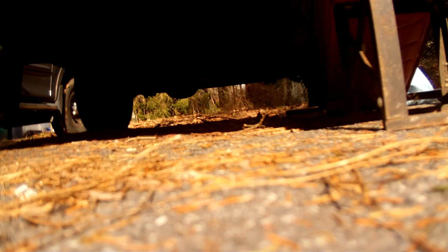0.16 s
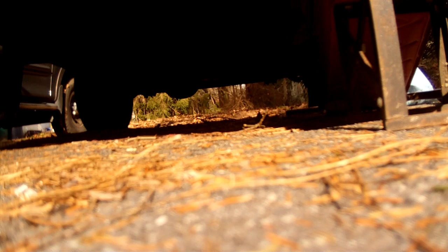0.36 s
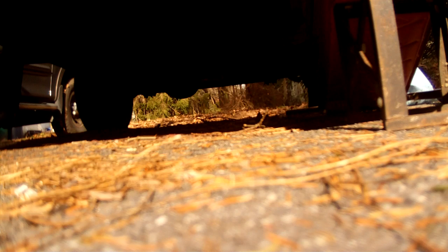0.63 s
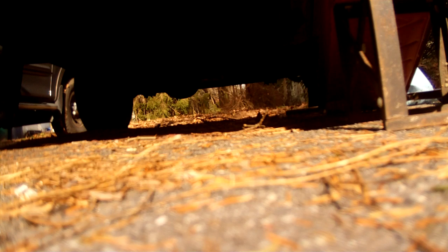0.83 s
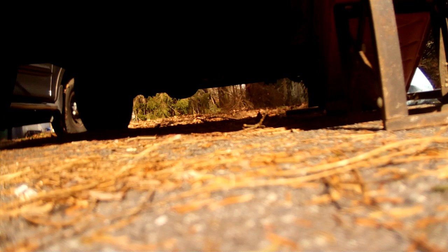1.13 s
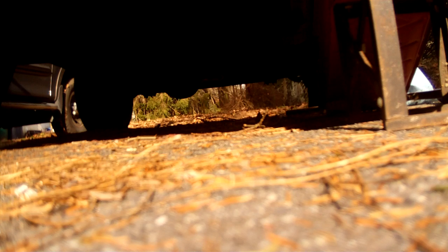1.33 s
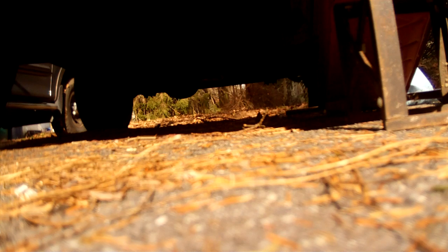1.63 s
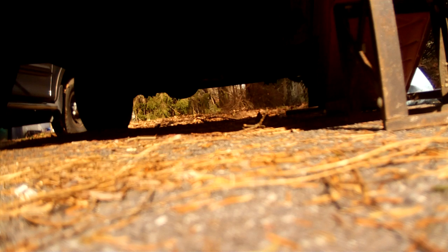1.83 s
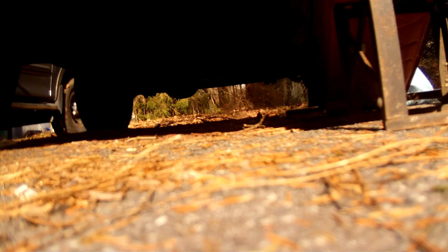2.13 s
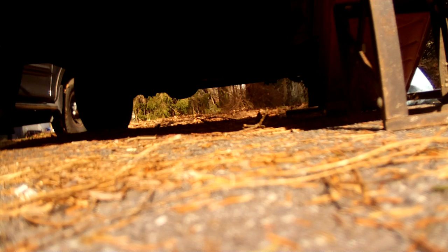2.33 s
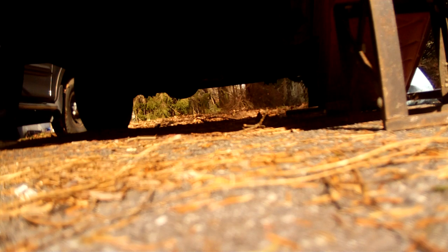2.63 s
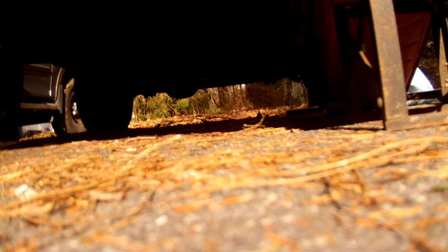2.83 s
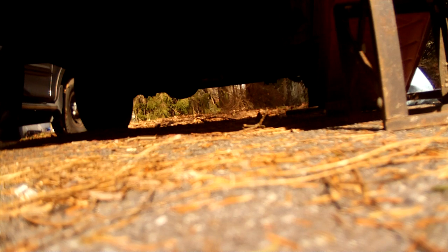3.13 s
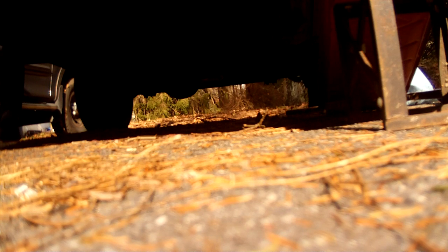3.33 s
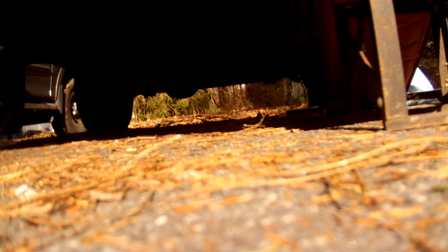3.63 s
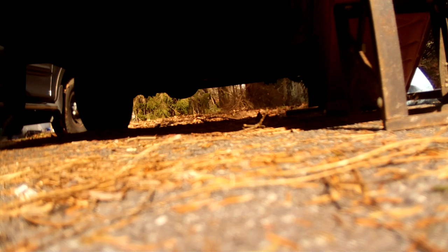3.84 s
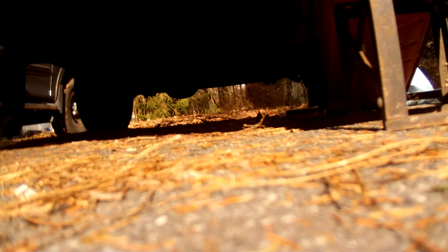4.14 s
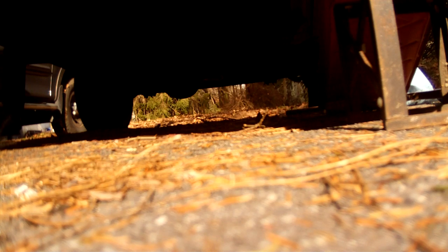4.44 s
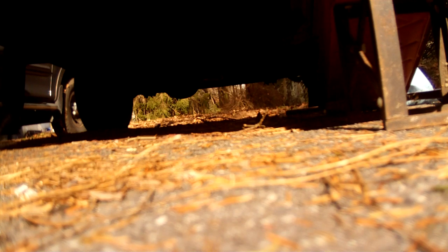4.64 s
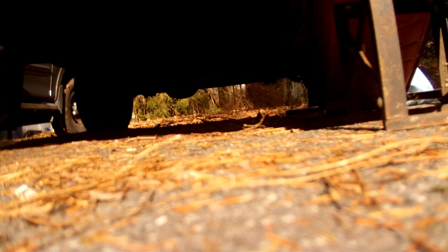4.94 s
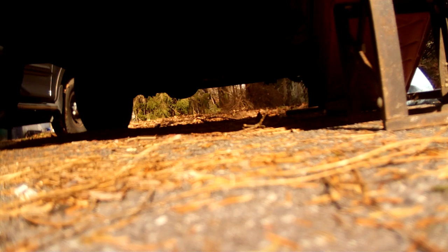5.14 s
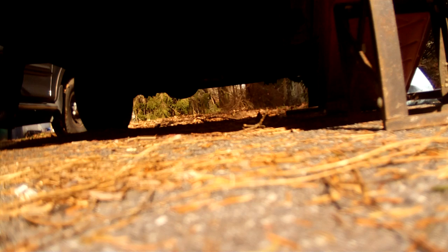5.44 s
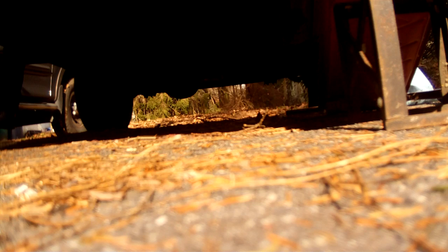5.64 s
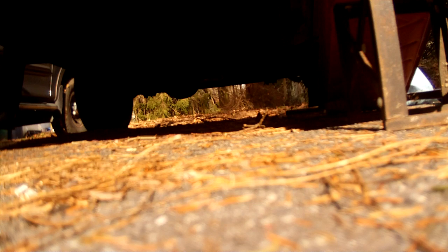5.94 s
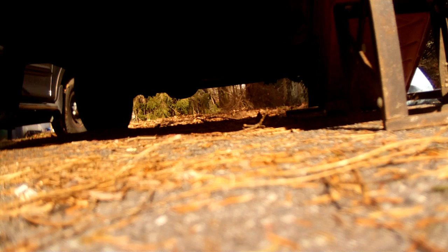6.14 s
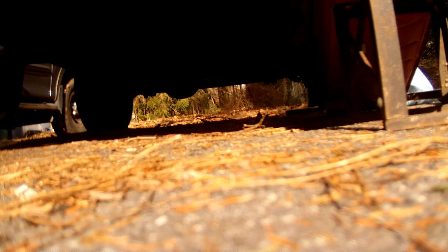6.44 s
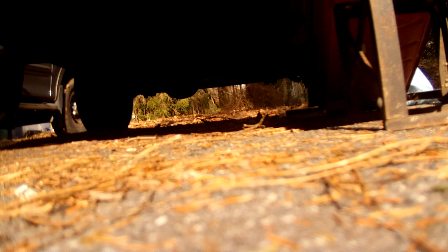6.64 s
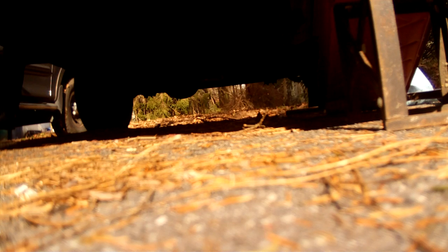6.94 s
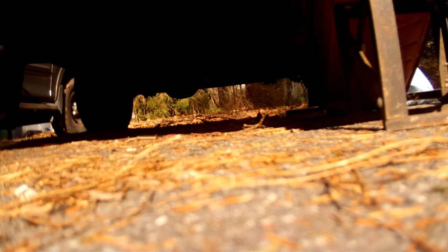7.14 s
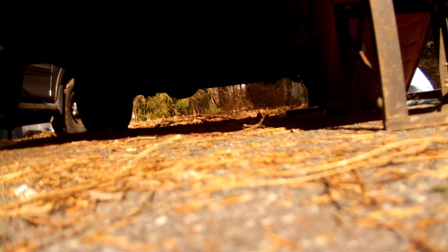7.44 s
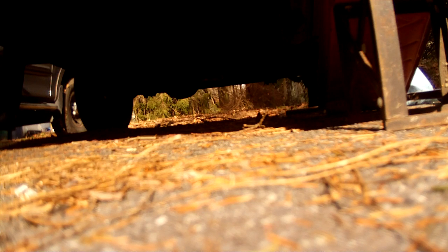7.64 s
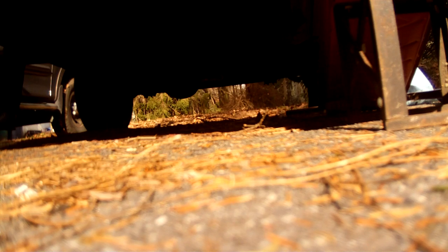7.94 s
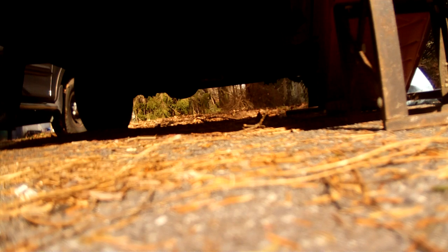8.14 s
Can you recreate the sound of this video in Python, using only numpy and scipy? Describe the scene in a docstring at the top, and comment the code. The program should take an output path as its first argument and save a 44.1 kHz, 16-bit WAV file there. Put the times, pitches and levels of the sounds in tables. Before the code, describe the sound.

A six-cylinder car with an open exhaust cranks, catches, idles with a thumping, ticking beat, then revs twice and stumbles back down.

```python
"""A six-cylinder car with an open exhaust, heard by a small microphone on the gravel below.
A brief hiss fades in a quiet yard; at 0.5 s the starter engages, grinding, clunking and whining.
At 1.6 s the engine catches, then idles: each firing thumps the pipe and spits gas while valves tick.
From 6.4 s it is revved twice: the thumps merge into a tone whose crests drive the capsule to its stop.
Near 8 s the engine sinks back and stumbles, and late firings pop in the pipe."""
import sys
import numpy as np
from scipy import signal
from scipy.io import wavfile
from scipy.ndimage import uniform_filter1d

SR = 44100
rng = np.random.default_rng(int(sys.argv[2]) if len(sys.argv) > 2 else 0)


def file_out(sig):
    """Save sig as 16-bit WAV at sys.argv[1]."""
    # one column per channel
    cols = np.atleast_2d(sig).T
    # limit, then scale
    lim = np.clip(cols, -1, 1)
    pcm = np.round(lim * 32767).astype(np.int16)
    wavfile.write(sys.argv[1], SR, pcm)


N = 365148
T = np.arange(N) / SR

# firing rate: t/s, f/Hz
FIRING_RATE = [(1.45, 17.1), (1.72, 45.56), (1.85, 50.79), (1.92, 49.49), (2.02, 34.95), (2.39, 26.68),
               (2.69, 40.29), (2.86, 40.78), (3.1, 37.96), (3.8, 39.58), (4.06, 41.31), (4.42, 39.99),
               (4.64, 41.21), (5.94, 42.28), (6.15, 41.17), (6.44, 44.7), (6.59, 69.26), (6.78, 114.24),
               (6.85, 94.6), (6.97, 76.87), (7.29, 162.16), (7.34, 149.85), (7.51, 124.72), (7.83, 85.07),
               (8.11, 57.64), (8.28, 48.58)]
# one row per cylinder: blow-down/dB, reflection/dB, valve tick/dB, gas puff/dB, piston knock/dB
CYLINDERS = [(1, 1.5, -3, 2, -2), (0, 2.5, -7, -2.5, -14), (-5, -5, -4, 1, -10), (-2, -6, 0, 4, 0),
             (5, 3.5, -1.5, -1, -9), (-7, -3, -6, -3, -16)]
# unevenness of the cylinders' thumps: t/s, share of their level differences
LOPE = [(2.0, .5), (2.5, .25), (2.75, .45), (3.4, .5), (4.4, .95), (6.4, 1), (6.6, .5)]

def engine():
    """Phase locking: each source is excited at its own point of the firing cycle, with slight jitter."""
    hz, = curves(FIRING_RATE, left=0)
    count = np.cumsum(hz) / SR - .469  # phase in firings
    total = int(count[-1])
    opening = throttle()
    tone_db, thump_db, rasp_db, block_db = levels(hz, opening)
    cylinder_db = np.array(CYLINDERS)[np.arange(total) % len(CYLINDERS)].T
    firing_s = np.interp(np.arange(total), count, T)
    cylinder_db[:2] *= np.interp(firing_s, *np.transpose(LOPE))
    blow_db, echo_db, tick_db, puff_db, slap_db = cylinder_db
    pipe_jitter, pipe_scatter, jitter, scatter = rng.standard_normal((4, total))
    round_trip_s, puff_lead_s = .00525, .0015
    blow = firings(count, .24, .0003 * pipe_jitter, blow_db + 1.1 * pipe_scatter)
    echo = firings(count, .24, .0003 * pipe_jitter + round_trip_s, echo_db + 1.1 * pipe_scatter)
    gust = firings(count, .0615, .00043 * jitter - puff_lead_s, puff_db + 2 * scatter)
    taps = firings(count, .098, .00023 * jitter, tick_db + 1.5 * scatter)
    slap = firings(count, .059, .00023 * jitter, slap_db + 2 * scatter)
    distinct = 1 / (1 + (hz / 90) ** 8)  # single pulses fade out above 90 Hz
    exhaust = thumps(blow, echo, distinct, opening) * undb(thump_db) + firing_tone(count, tone_db)
    exhaust += rasp(gust, distinct) * undb(rasp_db)
    block = valve_gear(taps, hz, distinct, opening) + piston_knock(slap, distinct)
    return exhaust + block * undb(block_db) + shocks(count, total, hz, opening)


# throttle moves: opens/s, shuts/s, opening relative to idle (-1 to 1), rise/s, release/s
THROTTLE_MOVES = [(1.583, 1.922, 0.61, 0.01, 0.023), (1.958, 2.428, -0.33, 0.01, 0.0097),
                  (2.497, 2.96, 0.19, 0.016, 0.036), (6.413, 6.748, 0.45, 0.013, 0.065),
                  (6.91, 7.296, 0.7, 0.14, 0.054), (7.312, 7.536, 0.45, 0.042, 0.11),
                  (7.836, 8, 0.13, 0.0067, 0.031), (8.124, 8.166, 0.2, 0.012, 0.013)]

def throttle():
    """First-order lag: the opening approaches each setting exponentially, then relaxes to idle."""
    opening = 0
    for opens, shuts, share, rise, release in THROTTLE_MOVES:
        held_s = np.clip(T, opens, shuts) - opens
        opening += share * (1 - np.exp(-held_s / rise)) * np.exp(-np.maximum(T - shuts, 0) / release)
    return opening


# missed firings: t/s, duration/s, change of tone and thump/dB, change of rasp and block/dB
MISFIRES = [(3.064, 0.031, -6, -6), (6.8, 0.021, -14, 1.5), (6.977, 0.011, -28, 2.5),
            (7.315, 0.026, -36, 2)]
# firing tone against firing rate: f/Hz, level/dB
TONE_LEVEL = [(30, -46), (42, -46.5), (55, -49), (72, -41.5), (86, -34.5), (115, -28.5), (160, -23.5)]
IDLE_HZ, CATCH_S, CATCH_DB_PER_S, STUMBLE_S = 45.7, 1.637, 150, 7.9

def levels(hz, opening):
    """Source strength follows speed and load: levels in dB of tone, thump, rasp and block."""
    def follow(idle_db, db_per_octave, open_db):
        return idle_db + db_per_octave * np.log2(np.maximum(hz, 1) / IDLE_HZ) + open_db * opening

    catch_db = -CATCH_DB_PER_S * np.maximum(CATCH_S - T, 0) - 120 * (hz == 0)
    pulse_db = catch_db - 2 * np.clip((T - STUMBLE_S) / .036, 0, 1)
    noise_db = catch_db.copy()
    for s, duration, pulse_change, noise_change in MISFIRES:
        missed = np.clip(2 - 4 * abs(T - s) / duration, 0, 1)
        pulse_db += missed * pulse_change
        noise_db += missed * noise_change
    return (np.interp(hz, *np.transpose(TONE_LEVEL)) + pulse_db, follow(-34, 2.3, 4) + pulse_db,
            follow(-43, 3.2, 11.2) + noise_db, follow(-40, 1.4, 7.4) + noise_db)


# low and higher modes of the exhaust pipe: f/Hz, bandwidth/Hz, level/dB
PIPE_MODES = [(115.4, 26.6, 3), (260, 230, -6), (163.5, 35, 4), (50.5, 140, -35), (82.5, 100, -15),
              (200.4, 21, 2)]
UPPER_PIPE_MODES = [(265, 50, -3), (316, 40, 0), (400, 60, 1)]

def thumps(blow, echo, distinct, opening):
    """Pipe resonance: each blow-down and its inverted reflection from the open end ring the gas column."""
    pulses = blow - echo
    upper = ring(pulses * distinct, UPPER_PIPE_MODES) * undb(-30 + 26 * np.minimum(opening, 0))
    rounded = butter(pulses, 150)  # the valve opens gradually
    out = upper - ring(rounded * distinct, PIPE_MODES)
    branch = [(181, 12, 0)]  # one manifold branch rings with the blow-down alone
    out += undb(-13) * ring(ring(blow * distinct, branch), branch) * (opening > -.1)
    shut = np.clip(opening / -.35, 0, 1)  # a shut throttle favours one low mode
    low_mode = ring(out, [(106, 45, 0)])
    return out + shut * (undb(-5.5) * low_mode * abs(np.mean(low_mode * out)) - .58 * out)


def firing_tone(count, level_db):
    """Harmonic series: the firing rate and its octave, from pressure crests narrower than the troughs."""
    angle = 2 * np.pi * count
    wave = np.sin(angle - .15) + .51 * np.sin(2 * angle - .2)
    return -np.sqrt(2) * undb(level_db + walk(40)) * wave


# burst behind each shock, and the gas column swinging back: f/Hz, bandwidth/Hz, level/dB
CRACK_MODES = [(960, 390, 12), (2630, 3700, 1.5)]
REBOUND_MODES = [(1060, 770, 1.5), (490, 500, -3.5)]

def shocks(count, total, hz, opening):
    """Nonlinear steepening: in fast gas at open throttle, each crest gains a steep rise and fall."""
    height = .59 * np.maximum(opening, 0) ** .73 * np.interp(hz, [48, 76], [0, 1])
    chance = rng.standard_normal((total, 3)).T
    rise = firings(count, -.15, .0004 * chance[0], 2.5 * chance[1])
    fall = firings(count, .14, .0003 * chance[1], 1.5 * chance[2])
    fall *= np.where(np.gradient(hz) > 0, 1.43, .78)  # stronger while speed rises
    edge = np.exp(-.5 * (np.arange(-100, 101) / (.0002 * SR)) ** 2)
    fronts = CAPSULE_STOP * np.convolve(1.4 * rise - fall, edge / edge.sum(), "same")
    crack = undb(-17) * noise(CRACK_MODES) * puffs(fall, rise_s=.000092, fall_s=.0023)
    rebound = undb(-24.5) * ring(fall + .5 * np.sign(walk(150)) * rise, REBOUND_MODES)
    return (fronts + crack - rebound) * height


# pipe modes excited by the gas puffs: f/Hz, bandwidth/Hz, level/dB
RASP_MODES = [(313, 440, 1), (834, 49, 5.5), (1020, 26, 2.5), (1280, 190, -7), (1393, 22, -1),
              (1890, 320, -14)]

def rasp(gust, distinct):
    """Pulsed flow noise: each puff of gas hisses through the pipe's modes."""
    flow = .2 + 1.3 * puffs(gust, rise_s=.0025, fall_s=.00082)
    hiss = ring(rng.standard_normal(N) * flow * undb(1.5 * walk(150)), RASP_MODES)
    fronts = np.roll(gust * distinct, int(.0022 * SR))  # the ring comes just after the puff begins
    out = undb(1.5) * butter(hiss, 240, "high") + undb(-3) * putts(fronts)
    hollow = signal.lfilter(*signal.iirnotch(570, 570 / 200, SR), out)  # dip between boom and rasp
    return .3 * out + .7 * hollow


def putts(fronts):
    """Impulse excitation: each puff's rounded front strikes the rasp modes in a new mix."""
    where = np.flatnonzero(fronts)
    out = 0
    for hz, width, db in RASP_MODES[1:]:
        blows = np.zeros(N)
        blows[where] = fronts[where] * undb(2.5 * rng.standard_normal(len(where)))
        blows[where] *= rng.choice([-1, 1], len(where))
        out += undb(db) * resonate(blows, hz, width + 50) / np.sqrt(width + 50)
    return unit_rms(butter(out, [650, 1500], "band"))


# late firings: t/s, f/Hz, level/dB, 60 dB decay time/s
LATE_FIRINGS = [(6.968, 894, -24, .025), (6.969, 215, -18, 0.037), (7.015, 1013, -21, 0.05),
                (7.578, 920, -19.5, 0.03), (7.925, 153, -27, 0.12), (7.973, 151, -24, 0.087),
                (8.001, 124.7, -24, 0.074), (8.035, 110, -28.5, 0.053), (8.065, 118, -23.5, 0.11),
                (8.126, 138, -19.5, 0.041), (8.16, 128.6, -21, 0.18), (8.188, 122.4, -13, 0.054),
                (8.212, 154, -17, 0.056), (8.246, 139, -28, 0.15)]

def burbles():
    """Damped oscillation: each late firing swells within one cycle and rings out in the pipe."""
    out = np.zeros(N)
    for s, hz, db, t60 in LATE_FIRINGS:
        age = np.maximum(T - s, 0)
        envelope = 2 * undb(db - 60 * age / t60) * (1 - np.exp(-2 * hz * age))
        out += envelope * np.sin(2 * np.pi * hz * age)
    return out


# modes of the engine block: f/Hz, bandwidth/Hz, level/dB
BLOCK_MODES = [(2480, 720, 0.5), (3320, 37, 7.5), (3944, 460, 2), (5030, 600, 1.5), (8670, 3300, -1),
               (10100, 5900, -6.5)]

def valve_gear(taps, hz, distinct, opening):
    """Amplitude modulation: belt noise pulses with the ticks, which blur into it at speed unless loaded."""
    belt = grind(BLOCK_MODES, 40, 2.04) * (.77 + .87 * puffs(taps, rise_s=.0036, fall_s=.0071))
    sharpness = np.maximum(1 / (1 + (hz / 58) ** 8), 1.3 * opening * distinct)
    return belt + undb(-4) * ticks(taps * sharpness)


# modes of the valve gear: f/Hz, bandwidth/Hz, level/dB
VALVE_MODES = [(798, 160, 4), (965, 16, 6.5), (1230, 21, 2), (1400, 61, -17), (1840, 51, -2.5),
               (2810, 120, 1.5), (3460, 61, -2), (3740, 250, -25), (4750, 64, 3.5), (5020, 61, -5),
               (5540, 160, 8), (6650, 820, -11), (8400, 3800, 9.5), (10000, 1200, 6.5)]

def ticks(taps):
    """Impact noise: each tick is a short rattle that rings the valve gear's modes in a new mix."""
    where = np.flatnonzero(taps)
    out = 0
    for hz, width, db in VALVE_MODES:
        blows = np.zeros(N)
        blows[where] = taps[where] * undb(2.2 * rng.standard_normal(len(where)))
        rattle = puffs(blows, rise_s=.0002, fall_s=.0018) * rng.standard_normal(N)
        out += undb(db) * resonate(rattle, hz, width) / np.sqrt(width)
    return unit_rms(out)


# modes of the piston knock: f/Hz, bandwidth/Hz, level/dB
PISTON_MODES = [(2010, 180, 8), (2500, 360, -25), (2800, 420, 4.5)]

def piston_knock(slap, distinct):
    """Exponential decay: each piston's knock is a dying burst of resonant noise."""
    return undb(-4) * distinct * noise(PISTON_MODES) * puffs(slap, rise_s=.0009, fall_s=.027)


# the hardest ticks: t/s, relative level/dB
HARD_TICKS = [(2.574, -11.5), (2.658, -33), (2.708, -12.5), (2.73, -13.5), (3.187, -17), (3.342, -31),
              (3.37, -15), (3.5, -14.5), (3.65, -16), (3.803, -13), (4.395, -20), (4.543, -17),
              (4.984, -12), (5.123, -21), (5.554, -14.5), (6.431, -24), (6.473, -9.5), (7.017, -21)]

def hard_ticks():
    """Impulse response: a sharp blow rings the block, and a burst of noise follows."""
    modes = BLOCK_MODES + RASP_MODES[1:3] + [(5550, 660, 6.9)]
    s, db = np.transpose(HARD_TICKS)
    clicks = np.bincount((s * SR).astype(int), undb(db - 17.5), N)
    response = ring(signal.unit_impulse(int(.04 * SR)), modes)
    blows = undb(5) * signal.fftconvolve(clicks, response / abs(response).max())[:N]
    return blows + noise(modes) * puffs(clicks, rise_s=.00019, fall_s=.0097)


# swells of treble sizzle: t/s, spread/s, level/dB
SIZZLES = [(6.63, .076, -28.5), (7.17, .043, -29), (7.26, .024, -33.5), (7.33, .017, -38)]

def sizzle():
    """Gaussian envelopes: a bright treble sizzle swells and fades during the revs."""
    envelope = sum(undb(db) * np.exp(-.5 * ((T - s) / spread) ** 2) for s, spread, db in SIZZLES)
    return grind([(4360, 3600, 8), (11000, 4000, -17)], 130, 2.5) * envelope


# modes of the starter and bell housing: f/Hz, bandwidth/Hz, level/dB
HOUSING_MODES = [(510, 3200, -8.5), (802, 79, 5.5), (1115, 170, 2.5), (1330, 460, 5.5), (1860, 310, 3.5),
                 (2340, 50, 9), (2724, 38, 11.5), (3030, 45, 4.5), (3430, 690, 2), (4300, 3300, -5.5),
                 (6000, 260, -0.5), (7000, 460, 2), (7900, 1040, -1), (9700, 3000, 0)]
ENGAGED_S, COAST_S, RELEASED_S = .501, 1.58, 1.8

def starter():
    """Forced vibration: the gears grind, clunk and whine in the bell housing, and the body shakes."""
    grinding = grind(HOUSING_MODES, 34.87, 3.7) * undb(labour() + .24 * walk(200))
    clatter, thuds = clunks()
    shake = undb(-66) * noise([(31.7, 39, 0)]) * (T > ENGAGED_S)
    return thuds + shake + butter(grinding + clatter + armature() + whines(), 380, "high")


# starter labouring over compressions: t/s, level/dB, hold/s, decay rate/(dB/s)
SURGES = [(0.51, -36, .005, 128), (0.563, -33, .02, 100), (0.598, -32.5, 0.25, 38), (0.62, -28.5, .015, 90),
          (0.74, -37, .02, 90), (0.826, -30.5, 0.019, 120), (0.87, -32, .01, 57), (1.043, -28, 0.0066, 44),
          (1.241, -25.5, 0.013, 120), (1.401, -27.5, 0.0055, 98), (1.503, -30.5, 0.0065, 300),
          (1.541, -31, 0.017, 12), (1.62, -30.5, 0.058, 17)]

def labour():
    """Load modulation: the grinding level in dB surges over each compression, then runs down."""
    level_db = -38 - 7.5 * np.maximum(T - COAST_S, 0)
    for s, db, hold, decay in SURGES:
        surge_db = db - decay * np.maximum(T - s - hold, 0)
        level_db = np.maximum(level_db, np.where((T > s) & (T < RELEASED_S), surge_db, -120))
    return np.where(T > ENGAGED_S, level_db, -120)


# tooth impacts: t/s, relative level/dB, 60 dB decay time/s, brightness/dB
TOOTH_IMPACTS = [(0.509, -15.5, 0.21, 4), (1.045, -13, 0.22, -16), (1.241, -14.5, 0.18, -12),
                 (1.404, -17, 0.26, -18.5), (1.593, -23, 0.089, 12)]

def clunks():
    """Backlash: gear teeth slap across their play, each time with a clatter and a low thud."""
    dull = noise([(550, 68, 1), (830, 73, 4.5), (1170, 330, 2), (1520, 270, 3)])
    bright = noise([(3970, 8300, 0)])
    low = noise([(176, 34, 0)])
    clatter = thuds = 0
    for s, db, t60, bright_db in TOOTH_IMPACTS:
        age = np.maximum(T - s, 0)
        clatter += (T > s) * (dull + undb(bright_db) * bright) * undb(db - 14 - 60 * age / t60)
        thuds += (T > s) * low * undb(db - 38 - 60 * age / .5)
    return clatter, thuds


# armature whirr: f/Hz, bandwidth/Hz, level/dB
WHIRR_MODES = [(4270, 1700, 0), (6850, 230, 2), (9500, 2500, 0)]
# armature singing: t/s, level/dB
SING_LEVEL = [(.5, -58), (.9, -58), (1.5, -45), (1.95, -51), (2.3, -55), (2.5, -63), (2.6, -90)]

def armature():
    """Band-limited noise: the armature whirrs while engaged and sings near 7 kHz until it has run down."""
    whirr = grind(WHIRR_MODES, 30.4, 1.8) * undb(-51) * (T > ENGAGED_S) * (T < RELEASED_S)
    sing_db, = curves(SING_LEVEL, left=-120)
    return whirr + grind([(7100, 240, 0)], 30.5, 1.7) * undb(sing_db)


# gear whine, one list per glide: t/s, f/Hz, level/dB
GEAR_GLIDES = [
    [(.6, 2980, -48), (.63, 3020, -35), (.67, 3000, -46)],
    [(.61, 3380, -48), (.635, 3400, -37), (.67, 3400, -48)],
    [(.6, 1880, -48), (.67, 1900, -40), (.74, 1960, -45)],
    [(.7, 2720, -44), (.725, 2700, -34), (.76, 2730, -31), (.78, 2790, -40), (.82, 2800, -41),
     (.85, 2730, -36), (.91, 2740, -46)],
    [(.82, 2450, -46), (.845, 2270, -35), (.862, 2150, -38), (.878, 2020, -28), (.9, 1920, -42)],
    [(.81, 830, -47), (.84, 820, -42), (.88, 815, -52), (.93, 835, -40), (.96, 835, -48)],
    [(1.88, 2080, -48), (2.0, 1900, -48), (2.2, 1630, -50), (2.45, 1300, -53), (2.6, 1150, -58)],
]

def whines():
    """Frequency modulation: the gears sound gliding tones that waver in pitch and level."""
    flutter_db, waver = 3 * walk(80), 1 + .012 * walk(250)
    out = 0
    for glide in GEAR_GLIDES:
        hz, db = curves(glide)
        sounding = (T > glide[0][0]) & (T < glide[-1][0])
        out += sounding * undb(db + flutter_db) * np.sin(2 * np.pi * np.cumsum(hz * waver) / SR)
    return out


# outdoor background: t/s, hiss level/dB, rumble level/dB
YARD_LEVELS = [(0, -54, -65), (.05, -56.5, -65), (.08, -67, -69), (.14, -68, -90), (.48, -69.5, -99)]

def yard():
    """Ambient noise: a hiss and a low rumble die away at first, leaving a faint floor."""
    hiss_db, rumble_db = curves(YARD_LEVELS)
    hiss = noise([(2500, 12000, -.5), (6800, 2700, 8), (12600, 3300, 6.5)])
    rumble = noise([(205, 43, -6), (700, 330, -18)])
    return hiss * undb(hiss_db) + rumble * undb(rumble_db)


def undb(db):
    """Amplitude ratio of a level in dB."""
    return 10 ** (np.asarray(db) / 20)


def unit_rms(x):
    """Normalisation to rms 1."""
    return x / np.sqrt(np.mean(x ** 2))


def curves(table, left=None):
    """Linear interpolation of each column over the first, t/s."""
    s, *columns = np.transpose(table)
    return [np.interp(T, s, column, left=left) for column in columns]


def butter(x, hz, kind="low", order=2):
    """Maximally flat filter."""
    return signal.sosfilt(signal.butter(order, hz, kind, fs=SR, output="sos"), x)


def resonate(x, hz, width):
    """Two-pole resonance with Q = hz / width."""
    return signal.lfilter(*signal.iirpeak(hz, hz / width, SR), x)


def ring(x, modes):
    """Superposition of modes (f/Hz, bandwidth/Hz, level/dB) with alternating sign; rms 1."""
    return unit_rms(sum((-1) ** k * undb(db) * resonate(x, hz, width)
                        for k, (hz, width, db) in enumerate(modes)))


def noise(modes):
    """Broadband excitation: one white noise drives all the modes; rms 1."""
    return ring(rng.standard_normal(N), modes)


def grind(modes, rate, flutter_db):
    """Incoherent excitation: each mode has its own noise and its own fluttering level; rms 1."""
    return unit_rms(sum(undb(db + flutter_db * walk(rate)) * resonate(rng.standard_normal(N), hz, width)
                        for hz, width, db in modes))


def walk(rate):
    """Random modulation: ramps to a new value every 1 / rate s; spread near 1."""
    hold = int(SR / rate)
    return uniform_filter1d(np.repeat(rng.standard_normal(N // hold + 1), hold), hold)[:N]


def firings(count, phase, late_s, db):
    """Impulse train: a click of level db, late_s after the count passes each whole number plus phase."""
    place = (np.interp(np.arange(len(db)) + phase, count, T) + late_s) * SR
    return np.bincount(np.minimum(place.astype(int), N - 1), undb(db), N)


def puffs(clicks, rise_s, fall_s):
    """Convolution: an envelope rises and dies after each click."""
    t = np.arange(int(.05 * SR)) / SR
    return signal.fftconvolve(clicks, np.exp(-t / fall_s) * (1 - np.exp(-t / rise_s)))[:N]


def scene():
    """Superposition: all sources add in one channel."""
    return (engine() + burbles() + sizzle() + hard_ticks() + starter() + yard())[None]


CAPSULE_STOP, CAPSULE_LEAK, CAPSULE_GIVE = 4.6, .998, .16  # give: share of the excess swing that passes

def record(dry):
    """One-sided clipping: the capsule's swing meets a stop on crests; the output is its rate of change."""
    swing = signal.lfilter([1], [1, -CAPSULE_LEAK], dry)
    swing -= (1 - CAPSULE_GIVE) * np.maximum(swing - CAPSULE_STOP, 0)
    out = signal.lfilter([1, -CAPSULE_LEAK], [1], swing)
    out = butter(out, 12, "high", order=1)
    out = butter(out, 12500)
    return signal.sosfilt(signal.ellip(10, .2, 80, 15500, fs=SR, output="sos"), out)


dry = scene()
out = record(dry)
file_out(out)
```